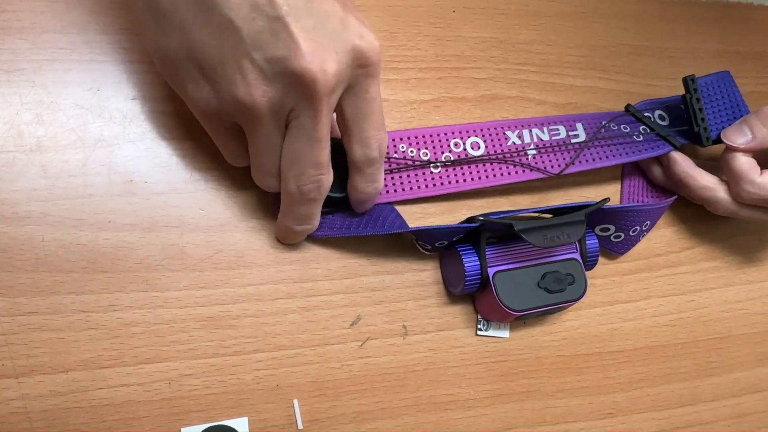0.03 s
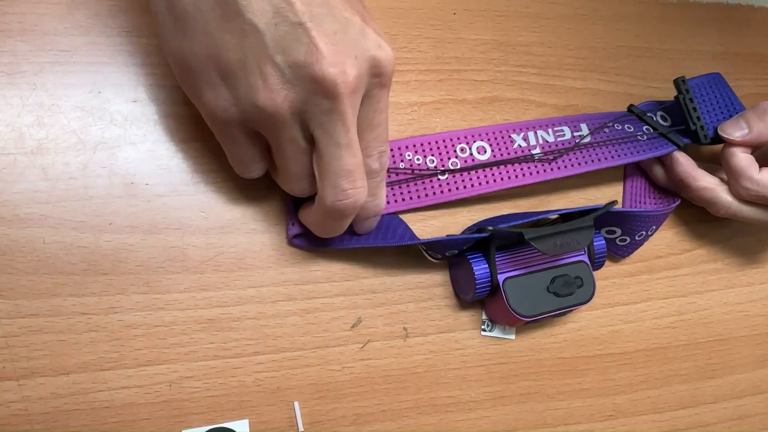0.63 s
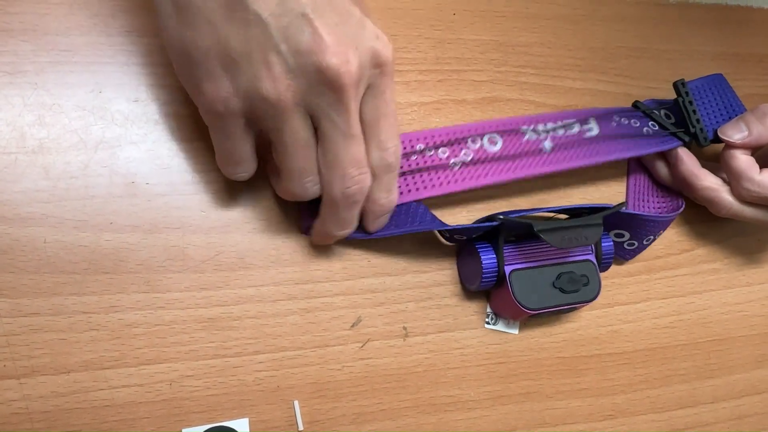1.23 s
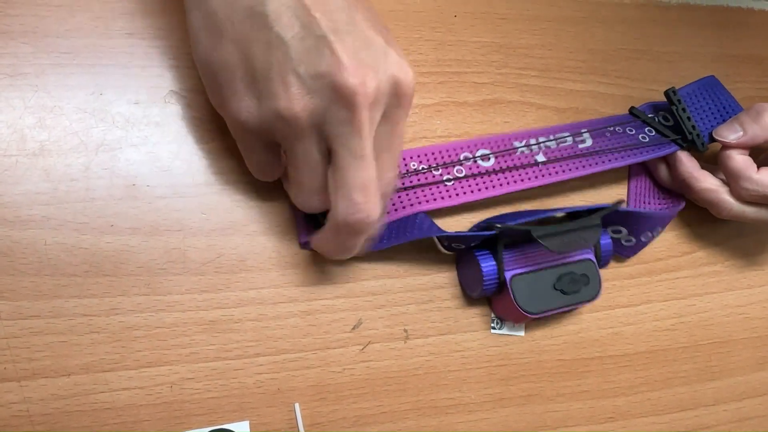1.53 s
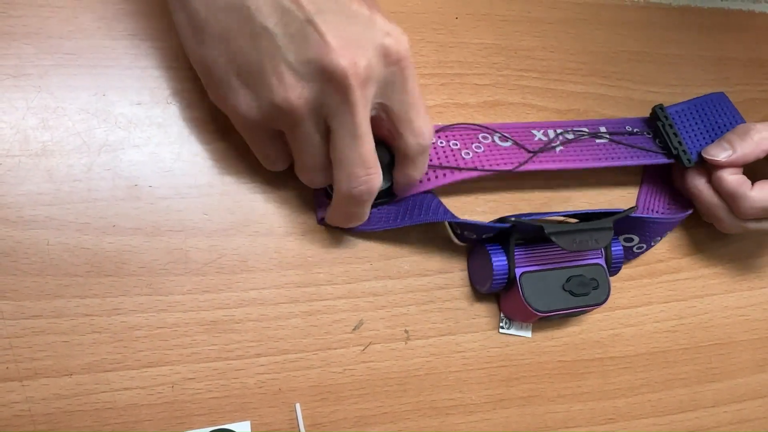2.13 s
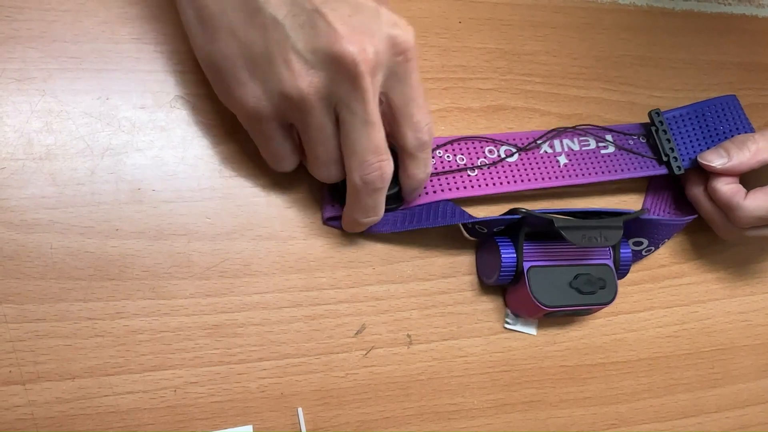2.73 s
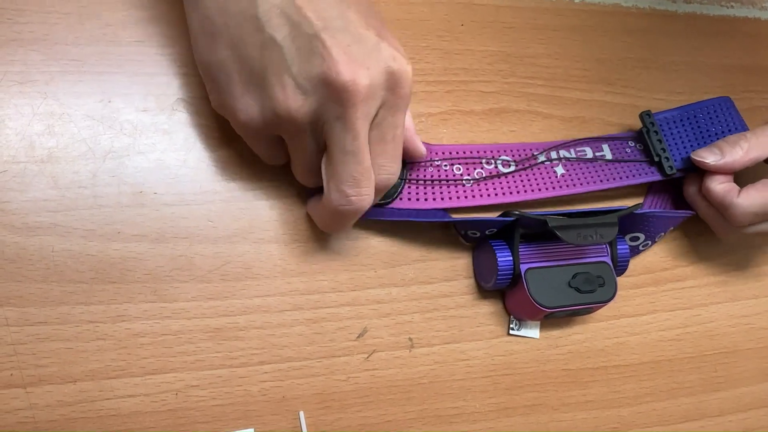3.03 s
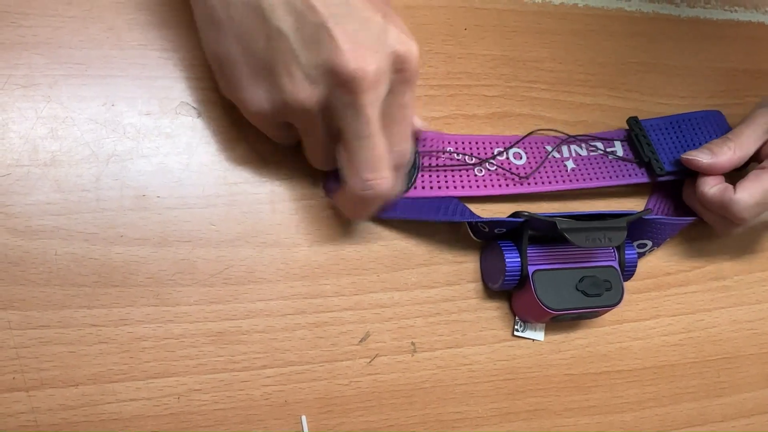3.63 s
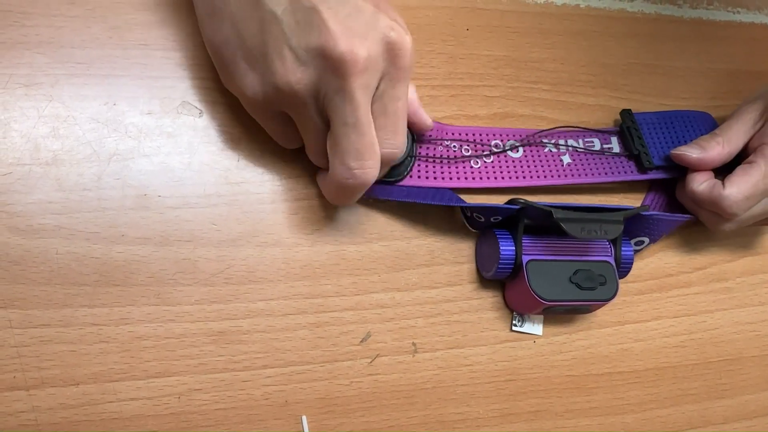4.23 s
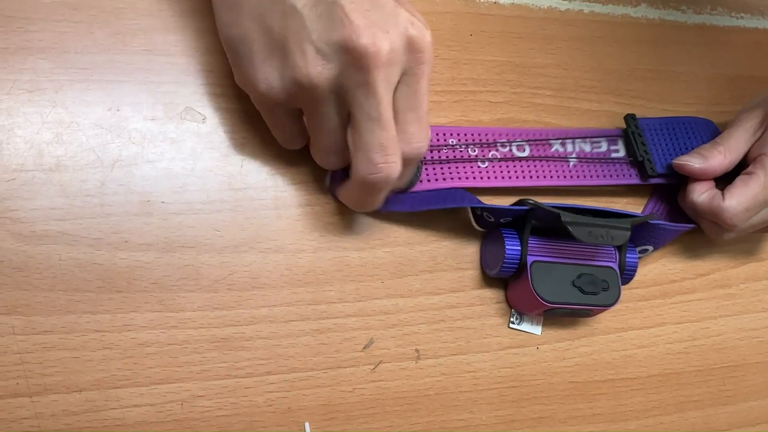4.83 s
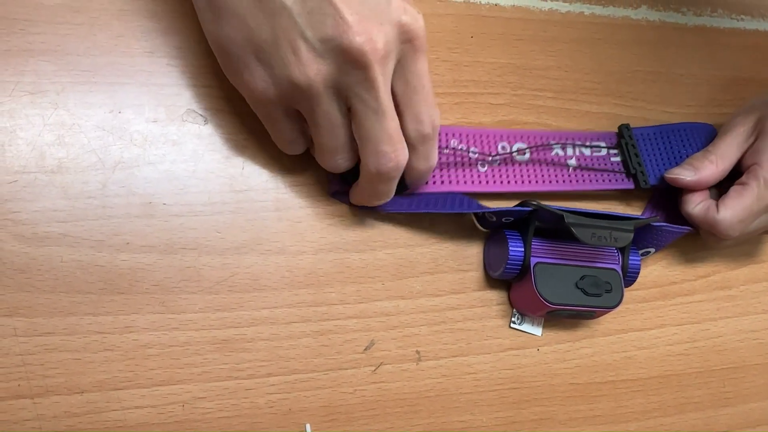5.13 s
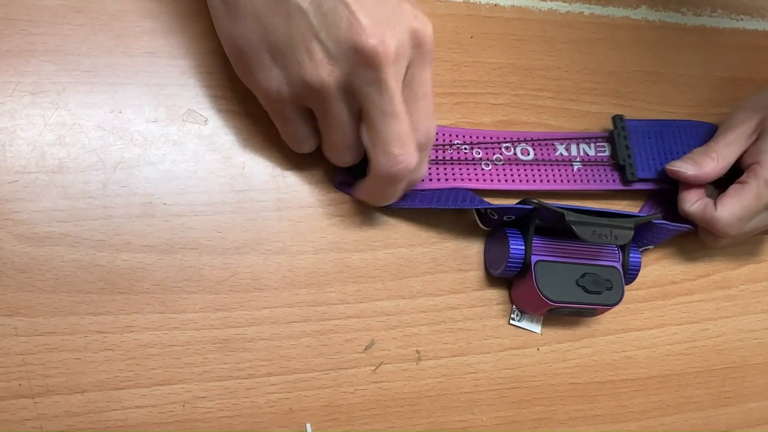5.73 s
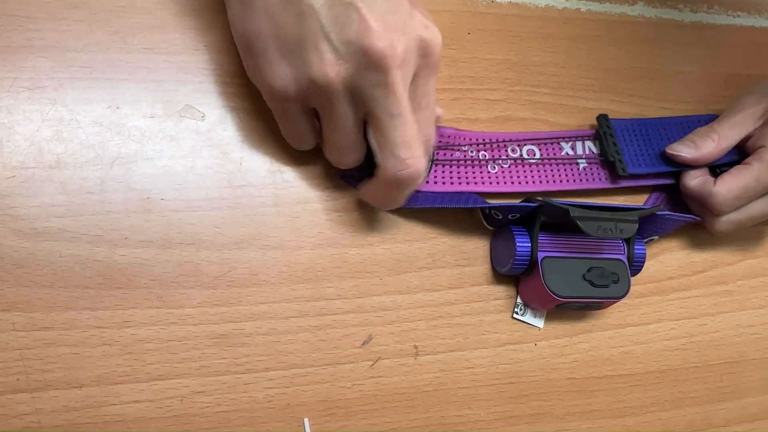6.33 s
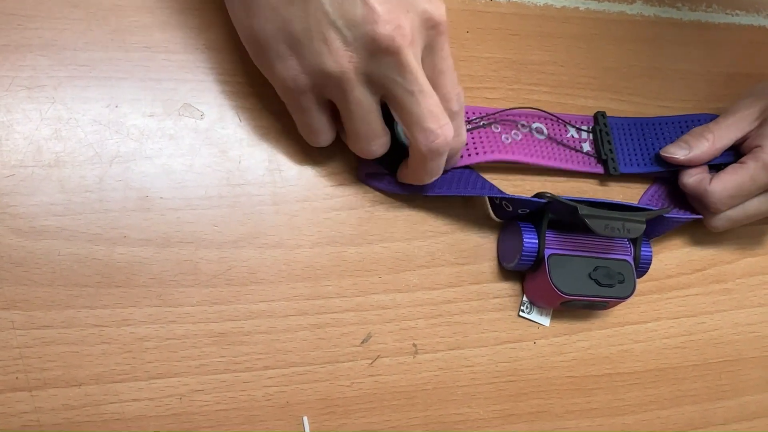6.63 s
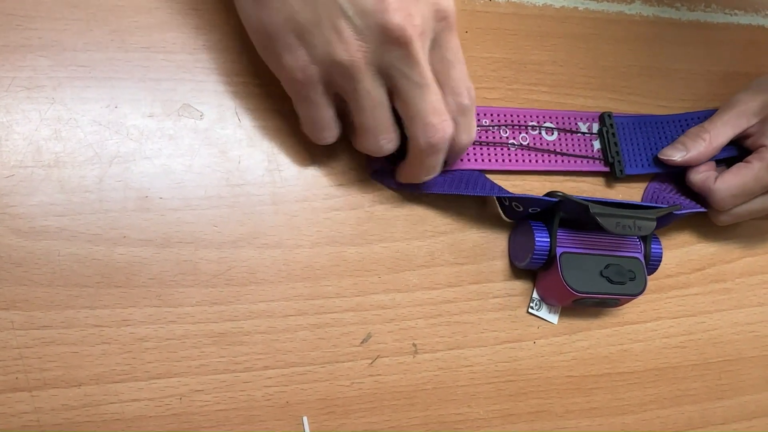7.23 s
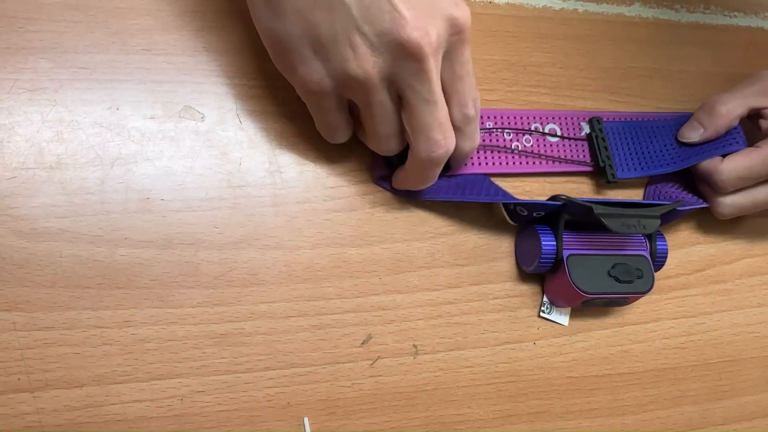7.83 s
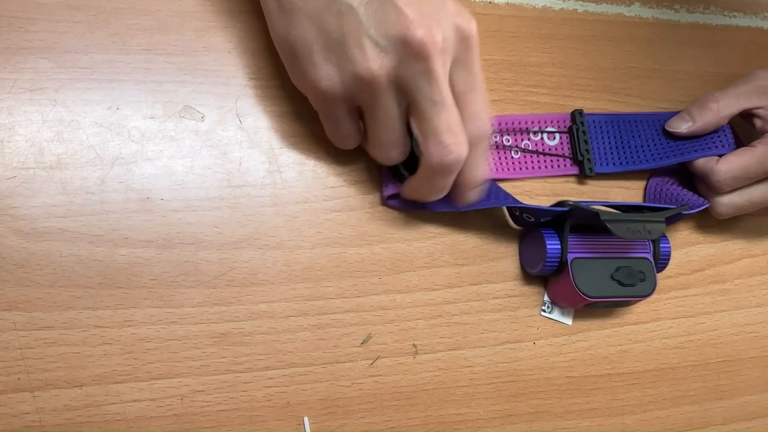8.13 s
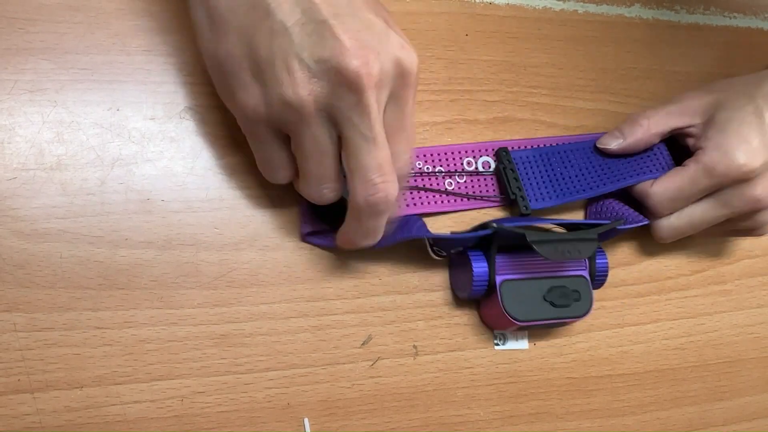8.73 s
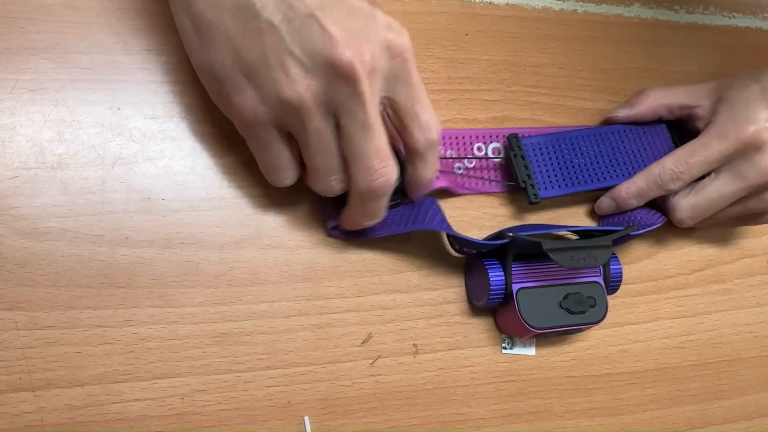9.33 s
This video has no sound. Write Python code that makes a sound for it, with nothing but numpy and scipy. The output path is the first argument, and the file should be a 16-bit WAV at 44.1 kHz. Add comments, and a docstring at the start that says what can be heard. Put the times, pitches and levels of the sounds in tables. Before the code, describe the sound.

Fingers turn a small plastic ratchet dial on a headlamp strap, making short bursts of crisp, bright clicks about twice a second throughout. Lighter scratchy ticks and faint rubbing come between the strokes as the fingers grip again. The hand bumps softly on a wooden table, and the strap drags with a low rumble near the end. The sound is close, in a small quiet room with a low hum.

```python
"""Short bursts of crisp plastic clicks, about two bursts a second, over soft wooden bumps and a low hum.
Fingers turn the ratchet dial of a headlamp strap just above a wooden table in a quiet room.
A pawl snaps over the teeth and rings the housing; between strokes the dial ticks as the fingers
grip again, and the hand bumps and drags on the table top."""
import sys
import numpy as np
from scipy import signal
from scipy.fft import rfft, irfft
from scipy.io import wavfile

SR = 44100
rng = np.random.default_rng(int(sys.argv[2]) if len(sys.argv) > 2 else 0)


def generate_wav(signal):
    """Clip the signal to [-1, 1] and save it as 16-bit WAV at the path in sys.argv[1]."""
    frames = np.transpose(np.atleast_2d(signal))
    scaled = np.clip(frames, -1, 1) * 32767
    pcm = np.round(scaled).astype(np.int16)
    wavfile.write(sys.argv[1], SR, pcm)


N = 414540
TIME = np.arange(N) / SR
SIZE, LEAD = 2048, 256  # samples: length of a click, and its run-up before the strike

# Strokes of the dial: first tooth t/s, last tooth t/s, teeth, first and last gap (ratios to mid-stroke),
# start level/dB, end level/dB, weight (housing against pawl)/dB, pawl ring/dB, housing ring/dB
STROKES = [(0.1088, 0.21, 7, 0.95, 0.95, 9, 3.1, 4, 1, -1.5),
           (0.7083, 0.7834, 6, 1.2, 1.2, 6, 8.7, -5, -3.5, 2), (1.3133, 1.3788, 5, 1, 2, 5.1, 3, 2, 1, 2.5),
           (1.7995, 1.8648, 6, 0.8, 1.76, 8.4, 5.4, -0.5, -0.5, -0.5),
           (2.3043, 2.3716, 8, 1.14, 1.38, 4.8, 9.3, 2, 2, -1),
           (2.8946, 2.9788, 9, 1.12, 1.18, 9, 10, -1, 2.5, -2),
           (3.5675, 3.629, 6, 1.86, 1.3, 9.5, 9.6, 3.5, 4, -3),
           (4.0937, 4.186, 9, 1.17, 1.07, 7.9, 7.6, -1.5, -1.5, 0),
           (4.626, 4.6968, 7, 1.57, 1.95, 7.2, 6.4, -2, 2, -1),
           (5.1394, 5.2347, 8, 1.36, 2.08, 6.5, 3, -3, -2, 0),
           (5.6845, 5.7794, 9, 0.63, 1.26, 6.2, 0.81, -2, -1, 3),
           (6.2587, 6.348, 7, 1.54, 1.5, 1.1, 3.3, 0.5, -0.5, 3.5),
           (6.7502, 6.838, 7, 1.12, 0.86, 7.6, 3.7, -7, -1.5, 2),
           (7.293, 7.374, 9, 1.5, 1.02, 3.9, 3.4, -2, -1, 2),
           (7.8581, 7.94, 9, 1.04, 1.54, 6.6, 1.9, -2, 0.5, 3),
           (8.4112, 8.4876, 6, 1.38, 2.33, 3.2, 1, -2, -0.5, -2),
           (8.5061, 8.5328, 3, 0.73, 1.27, 2.1, 1.8, -2.5, -9, 1),
           (8.98, 9.051, 8, 1.23, 1.74, 7.3, 0.36, -2, 2.5, -2)]
# Tone of the snapping plastic: f/Hz, level/dB
SNAP_TONE = [(300, -33), (800, -22.5), (1300, -18.5), (2100, -11), (3300, -8.5), (4300, -9.5), (6500, -5),
             (8300, -5), (10000, -3), (12300, -7.5), (13800, -0.5), (15600, 2.5), (17000, -29)]
# Tone of the room: f/Hz, level/dB
ROOM_TONE = [(300, 3.5), (3000, 10), (15000, 0.5)]


def undb(db):
    """Decibels to gain."""
    return 10 ** (np.asarray(db) / 20)


def unit(x):
    """Scale to an energy of one along the last axis."""
    return x / np.sqrt(np.sum(x ** 2, axis=-1, keepdims=True))


def curve(points, hz):
    """Join (f/Hz, value) points by straight lines on a log-frequency axis."""
    f, value = np.transpose(points)
    return np.interp(np.log(hz + 1), np.log(f), value)


def bins(size):
    """Frequencies of the bins of a spectrum."""
    return np.fft.rfftfreq(size, 1 / SR)


def colour(x, db):
    """Minimum-phase EQ with a gain per bin, so that nothing rings before a hit."""
    size = x.shape[-1]
    cepstrum = irfft(np.log(undb(db)), size)
    cepstrum[..., 1:size // 2] *= 2
    cepstrum[..., size // 2 + 1:] = 0
    return irfft(rfft(x) * np.exp(rfft(cepstrum)), size)


def fade(t, t60):
    """Exponential decay, 60 dB down after t60 seconds."""
    return np.exp(-np.log(1000) * t / t60)


def ring(modes, t, detune=0.):
    """Sum of decaying modes, each scaled by its energy and optionally detuned at random."""
    out = 0
    for hz, t60, db in modes:
        pitch = hz * (1 + detune * rng.standard_normal())
        out = out + undb(db) * unit(np.sin(2 * np.pi * pitch * t) * fade(t, t60))
    return out


def add(track, s, sound):
    """Lay a sound into a track at time s."""
    i = int(s * SR)
    track[..., i:i + sound.shape[-1]] += sound[..., :N - i]


def convolve(x, response):
    """Pass a sound through an impulse response."""
    return signal.fftconvolve(np.atleast_2d(x), np.atleast_2d(response), axes=-1)[:, :N]


def room_hum(rumble_db=-49.0, fan_hz=808, fan_db=-70.5):
    """Steady room rumble, nearly mono in the bass, with the thin tone of a fan."""
    # Tone of the rumble: f/Hz, level/dB
    rumble_tone = [(20, -33), (35, -15), (52, 6), (100, 1), (190, -8), (400, -13.5), (800, -18.5),
                   (1600, -22.5), (3000, -36), (6500, -41.5), (10000, -35), (15500, -58)]
    hz = bins(N)
    mid, side = rfft(rng.standard_normal((2, N))) * undb(curve(rumble_tone, hz))
    side = side * (.05 + .7 * hz ** 2 / (hz ** 2 + 230 ** 2))
    rumble = unit(irfft([mid + side, mid - side], N)) * np.sqrt(N)
    wander = np.cumsum(rng.standard_normal(N)) * 0.023
    fan = np.sqrt(2) * np.sin(2 * np.pi * fan_hz * TIME + wander)
    return undb(rumble_db) * rumble + undb(fan_db) * fan


def reverb(x, wet_db=-10, predelay_s=0.00095):
    """A small furnished room: a short, dense tail that lingers longest around 3 kHz."""
    # Decay of the room: f/Hz, t60/s
    decay_times = [(300, 0.099), (3000, 0.42), (15000, 0.26)]
    size = 16 * SIZE
    t, hz = np.arange(size) / SR, bins(size)
    noise = rfft(rng.standard_normal((2, size)))
    centres = np.geomspace(200, 16000, 9)
    tone = undb(curve(ROOM_TONE, hz)) * hz / (hz + 200)
    tail = 0
    for centre, share in zip(centres, np.eye(len(centres))):
        band = curve(np.column_stack([centres, share]), hz)
        tail = tail + irfft(noise * band * tone) * fade(t, curve(decay_times, centre))
    return undb(wet_db) * convolve(x, unit(tail * (t > predelay_s)))


def rustle(rub_db=-49, lead_s=0.0058, spread_s=0.014, idle_db=-28, patchy_db=6):
    """Skin and webbing rub as each stroke takes up the strain, and faintly in between."""
    effort = sum(np.exp(-((TIME - s + lead_s) / spread_s) ** 2) for s, *_ in STROKES)
    grain = np.interp(TIME, np.arange(200) / 20, rng.standard_normal(200))
    tone_db = curve(SNAP_TONE, bins(N)) + curve(ROOM_TONE, bins(N))
    rub = unit(colour(rng.standard_normal((2, N)), tone_db)) * np.sqrt(N)
    return undb(rub_db) * (effort + undb(idle_db + patchy_db * grain)) * rub


def table_top(bump_gain_db=23, push_s=0.00487, skid=0.68, skid_t60=0.6, thud_db=-3, side_db=-4):
    """Soft fingertips thud and skid on the wood; the dragged strap shakes its lowest mode."""
    # Modes of the table top: f/Hz, t60/s, level/dB
    wood_modes = [(104.3, 0.22, -4.5), (148, 0.13, -2.5), (257.3, 0.38, -3.5), (322.3, 0.083, -1.5),
                  (469.6, 0.09, -6.5), (742, 0.13, -7.5)]
    # Fingertips landing: t/s, relative level/dB
    bumps = [(0.642, -36.5), (1.487, -34.5), (1.985, -33.5), (2.135, -36.5), (2.505, -33.5), (2.651, -30.5),
             (2.722, -37), (3.092, -37), (3.311, -36), (3.724, -32), (4.293, -34.5), (4.406, -27),
             (5.539, -40.5), (6.042, -33.5), (6.531, -38), (6.587, -31), (6.898, -36.5), (7.26, -34),
             (7.446, -29.5), (7.86, -31), (8.191, -37.5), (8.384, -31), (8.821, -39.5), (9.357, -34)]
    # Envelope of the dragging strap: t/s, level/dB
    drag_levels = [(0, -55.5), (8.37, -60), (8.41, -44), (8.6, -43.5), (8.68, -59), (8.85, -44.5),
                   (9.1, -70), (9.4, -53)]
    t = np.arange(8 * SIZE) / SR
    skin = signal.butter(3, [90, 560], "bandpass", fs=SR, output="sos")  # skin passes no treble
    low_cut = signal.butter(1, 300, "highpass", fs=SR, output="sos")  # keeps the bass centred
    out = np.zeros((2, N))
    for s, db in bumps:
        grit = rng.standard_normal((2, 2, len(t)))
        push = unit(t * np.exp(-t / push_s) * grit[0])
        slide = skid * unit(fade(t, skid_t60) * grit[1])
        force = unit(signal.sosfilt(skin, push + slide))
        wood = unit(convolve(force, ring(wood_modes, t, detune=0.039))[:, :len(t)])
        mid, side = unit(wood + undb(thud_db) * force)
        width = undb(side_db) * signal.sosfilt(low_cut, side) * np.array([[1], [-1]])
        add(out, s - push_s, undb(db + bump_gain_db) * (mid + width))
    drag = unit(convolve(rng.standard_normal(N), ring(wood_modes[:1], t))) * np.sqrt(N)
    return out + drag * undb(np.interp(TIME, *np.transpose(drag_levels)))


def place_click(click, scatter_db=-2, scatter_t60=.023, delay_s=.0005, shade_db=4.5):
    """A click arrives left and right, both straight and scattered by the fingers and the table."""
    # Phase lead of the left side over the right: f/Hz, phase/rad
    phase_lead = [(300, .3), (2700, 1.6), (4400, .9), (6000, 1.9), (8200, 2), (10400, .5), (13000, -.5),
                  (16000, -2)]
    # Tone of the close reflections: f/Hz, level/dB
    scatter_tone = [(500, -4), (4000, 1.5), (8000, -3), (13000, -8)]
    t, hz = np.arange(SIZE) / SR, bins(SIZE)
    sides = np.array([[1], [-1]]) / 2
    direct = np.exp(1j * sides * curve(phase_lead, hz))
    reflections = unit(rng.standard_normal((2, SIZE)) * fade(t, scatter_t60) * (t > delay_s))
    scatter = undb(scatter_db + curve(scatter_tone, hz)) * rfft(reflections)
    shade = undb(sides * shade_db / (1 + ((hz - 4500) / 1800) ** 2))  # the hand shades the right side
    heard = irfft(rfft(click) * shade * (direct + scatter))
    return heard / np.sqrt(np.sum(heard ** 2))


def snap(weight_db, pawl_db, housing_db, scrape, pawl_hz=9960, rattle_db=-14, ring_db=-17):
    """One tooth: the pawl scrapes up its ramp, strikes, bounces and rattles; pawl and housing ring."""
    # Modes of the dial's housing: f/Hz, t60/s, level/dB
    housing_modes = [(1803, 0.017, -5.5), (2098, .016, 0)]
    t, hz = (np.arange(SIZE) - LEAD) / SR, bins(SIZE)
    grit = rng.standard_normal((3, SIZE))
    flight_s = rng.uniform(.0008, .0035)
    bounce = 1.6 * scrape * (abs(t - flight_s) < .5 / SR)
    strike = unit((t == 0) + bounce + scrape * grit[0] * (t > 0) * fade(abs(t), t60=0.009))
    rattle = undb(rattle_db) * unit(grit[1] * (t > 0) * fade(abs(t), t60=0.11))
    ramp = 0.62 * scrape * unit(grit[2] * (t < 0) * fade(abs(t), t60=0.029))
    pitch = pawl_hz * (1 + .028 * rng.standard_normal())  # each tooth bends the pawl differently
    pawl_peak = (5.5 + pawl_db) / (1 + ((hz - pitch) / 800) ** 2)
    body_shelves = weight_db / (1 + (hz / 7500) ** 8) + housing_db / (1 + (hz / 2800) ** 8)
    click = unit(colour(strike + rattle + ramp, curve(SNAP_TONE, hz) + pawl_peak + body_shelves))
    housing = ring(housing_modes, np.maximum(t, 0), detune=0.039)
    return click + undb(ring_db + weight_db / 2 + housing_db) * housing


def regrips():
    """Light, scratchy ticks: the dial shifts in its play as the fingers let go or grip."""
    # Ticks between strokes: t/s, level/dB
    ticks = [(0.373, -19), (0.68, -14), (0.93, -15), (1.278, -18.5), (1.501, -19), (1.693, -12.5),
             (2.643, -18.5), (3.161, -14), (3.309, -16), (3.815, -8), (4.393, -17.5), (4.824, -10.5),
             (5.398, -19.5), (6.064, -7.5), (6.472, -9.5), (7.011, -14), (7.568, -20), (8.088, -12),
             (8.728, -10), (9.232, -19)]
    for s, db in ticks:
        yield s, db, snap(weight_db=4, pawl_db=-3, housing_db=0, scrape=0.47)


def last_snaps():
    """One more tooth slips over as a stroke comes to rest, still damped by that stroke's grip."""
    # Late teeth: t/s, level/dB, weight (housing against pawl)/dB
    late_teeth = [(0.248, 7, -1), (0.8136, 9, 0), (1.9001, 8, 2), (2.421, 8, 3), (3.0293, 9, 4),
                  (4.2198, 7, -4), (4.7419, 10.5, -8), (5.2642, 3, -3), (5.8346, 3, -3), (7.98, 3.5, -1),
                  (9.083, 2.5, -3)]
    for s, db, weight_db in late_teeth:
        *_, pawl_db, housing_db = min(STROKES, key=lambda stroke: abs(stroke[0] - s))
        yield s, db, snap(weight_db, pawl_db, housing_db, scrape=0.3)


def tooth_times(start_s, end_s, teeth, opening, closing):
    """The dial changes speed smoothly: the time per tooth follows a parabola through the stroke."""
    progress = np.linspace(0, 1, teeth - 1)
    gaps = 1 + (1 - 2 * progress) * ((opening - 1) * (1 - progress) - (closing - 1) * progress)
    return start_s + (end_s - start_s) * np.append(0, np.cumsum(gaps)) / np.sum(gaps)


def ratchet(accent_db=2.5, thinning_db=4.0, level_spread_db=1.0, weight_spread_db=1.5):
    """Each stroke runs the pawl over slightly uneven teeth while the finger pressure rises or eases."""
    for *timing, start_db, end_db, weight_db, pawl_db, housing_db in STROKES:
        times = tooth_times(*timing)
        # The first tooth breaks loose from rest: harder, thinner and cleaner than those after it.
        yield times[0], start_db + accent_db, snap(weight_db - thinning_db, pawl_db, housing_db, 0.14)
        for s in times[1:]:
            db = np.interp(s, timing[:2], [start_db, end_db]) + level_spread_db * rng.standard_normal()
            tooth_weight_db = weight_db + weight_spread_db * rng.standard_normal()
            yield s, db, snap(tooth_weight_db, pawl_db, housing_db, scrape=0.21)


def dial():
    """All clicks of the dial, as a mono reverb send and as close stereo sound."""
    send, close = np.zeros(N), np.zeros((2, N))
    for s, db, click in [*ratchet(), *last_snaps(), *regrips()]:
        add(send, s - LEAD / SR, undb(db) * unit(click) / np.sqrt(2))
        add(close, s - LEAD / SR, undb(db) * place_click(click))
    return send, close


def scene():
    """Dial, fingers and table sound close by; the room answers and hums underneath."""
    send, clicks = dial()
    hands = rustle() + table_top()
    return clicks + hands + reverb(send + hands) + room_hum()


def record(dry):
    """A steep low-pass trims the very top of the treble."""
    return signal.sosfilt(signal.ellip(6, .5, 60, 15900, fs=SR, output="sos"), dry)


dry = scene()
out = record(dry)
generate_wav(out)
```